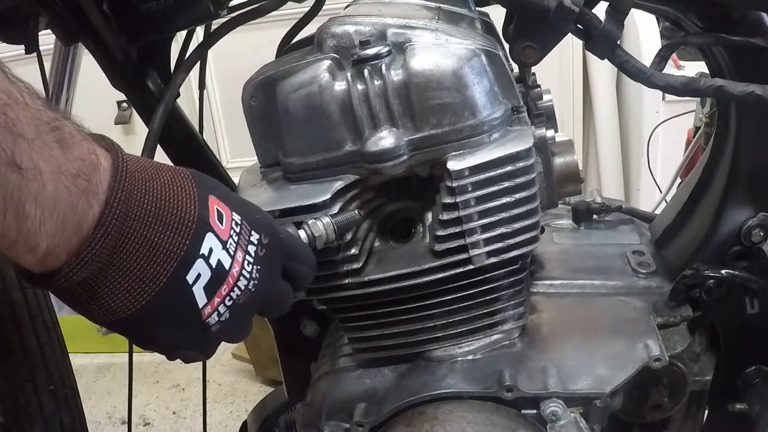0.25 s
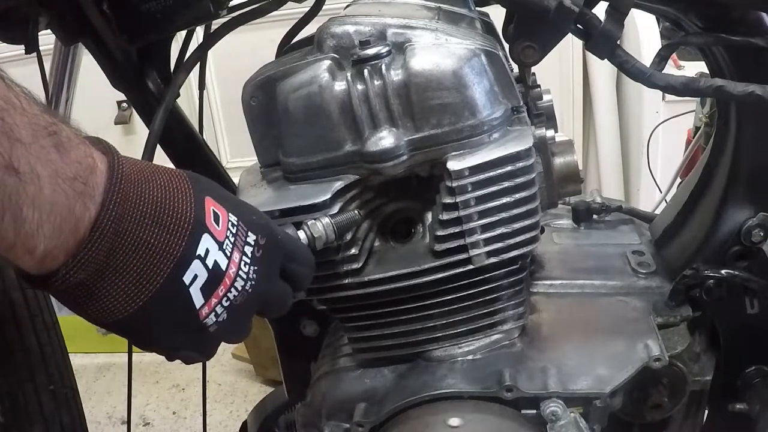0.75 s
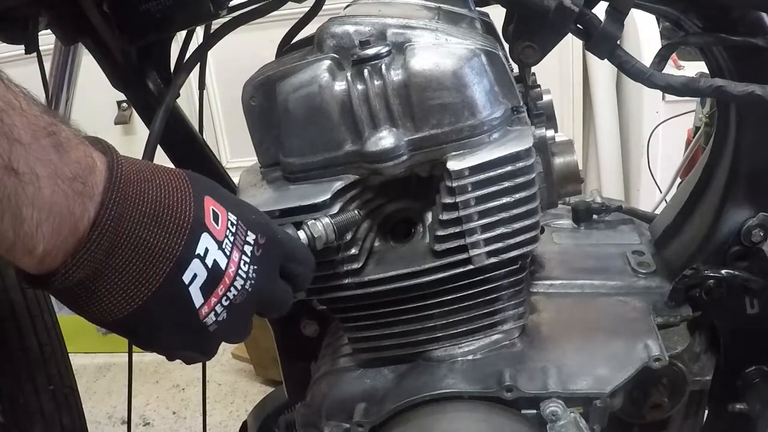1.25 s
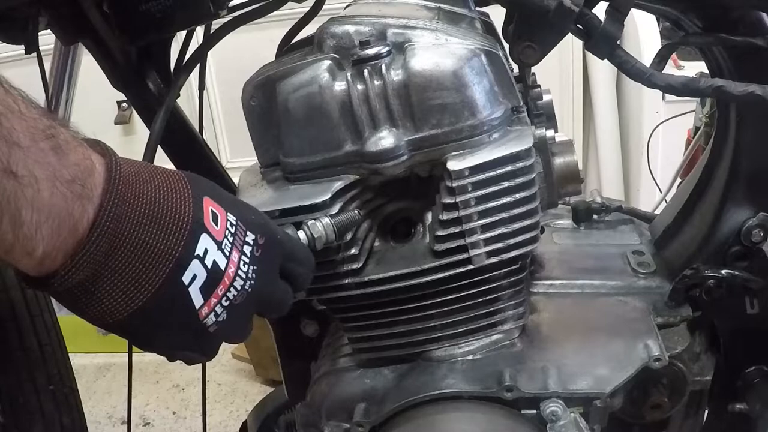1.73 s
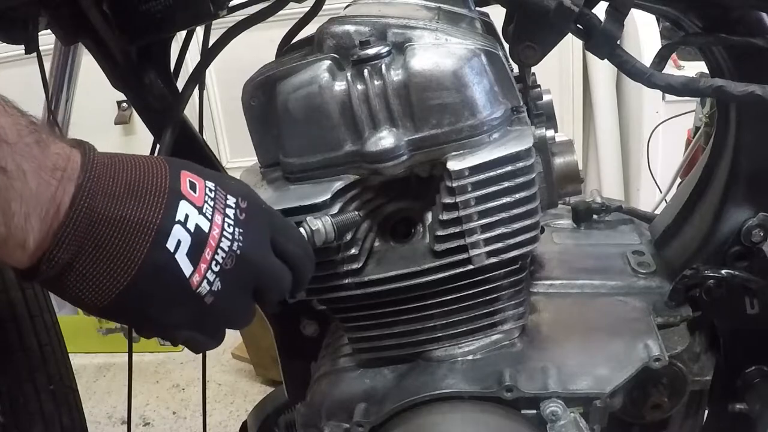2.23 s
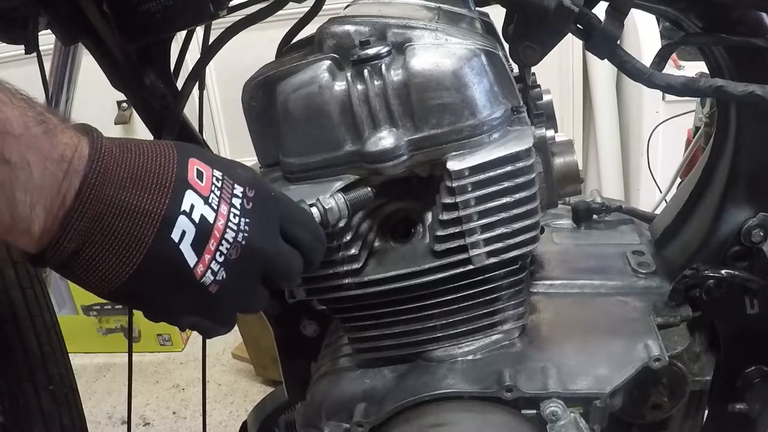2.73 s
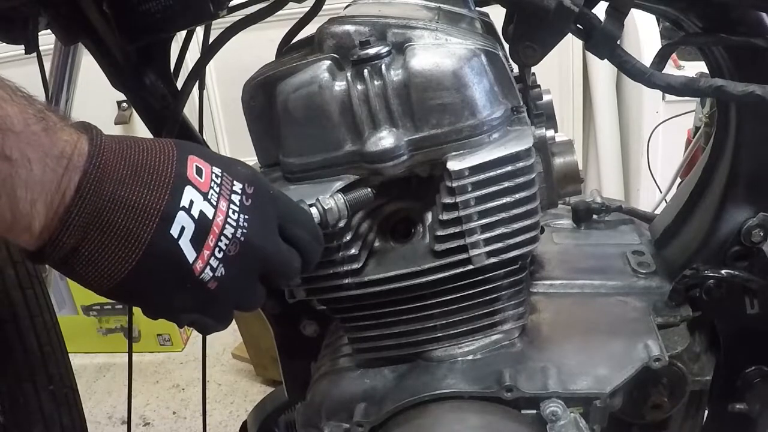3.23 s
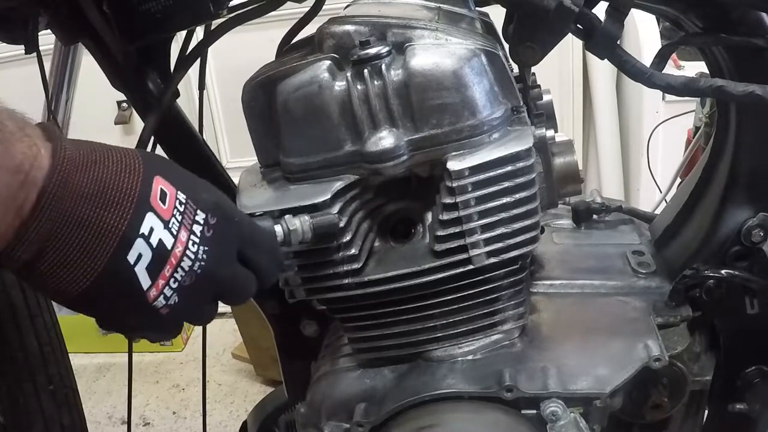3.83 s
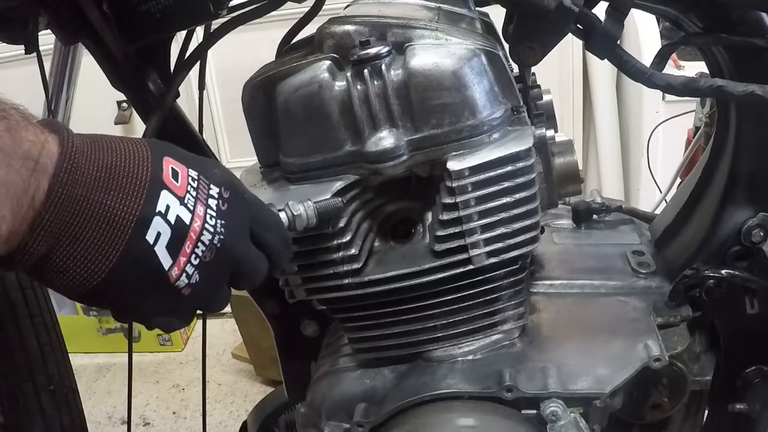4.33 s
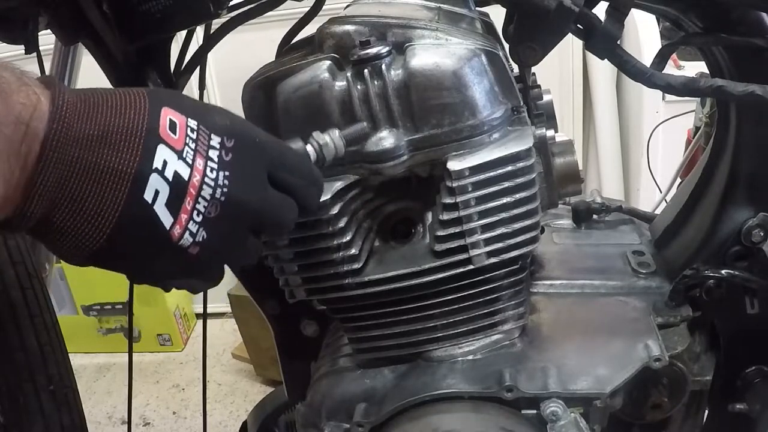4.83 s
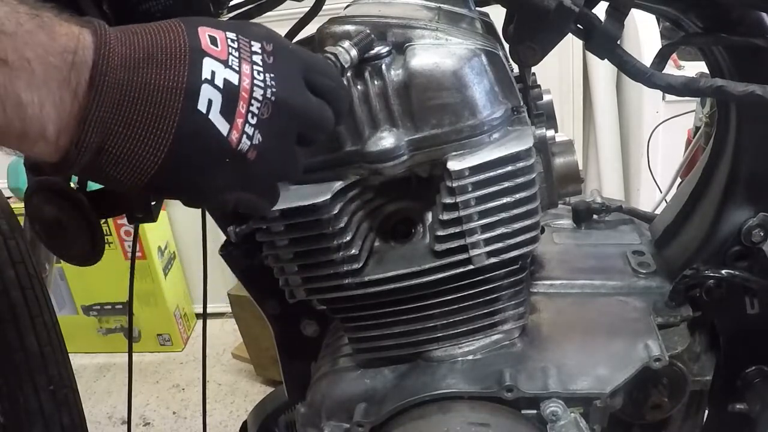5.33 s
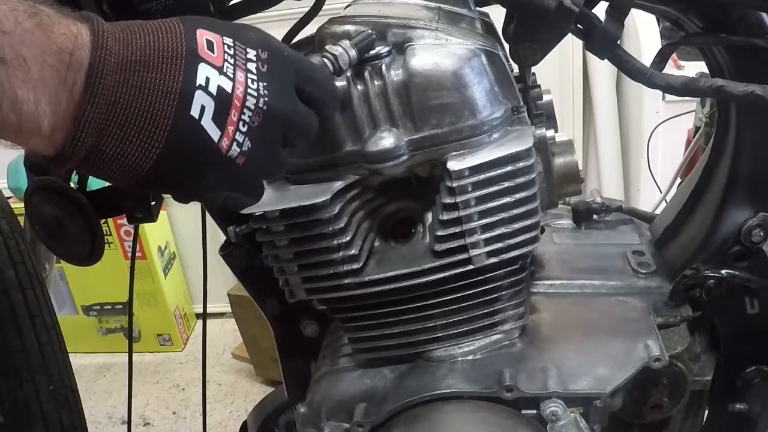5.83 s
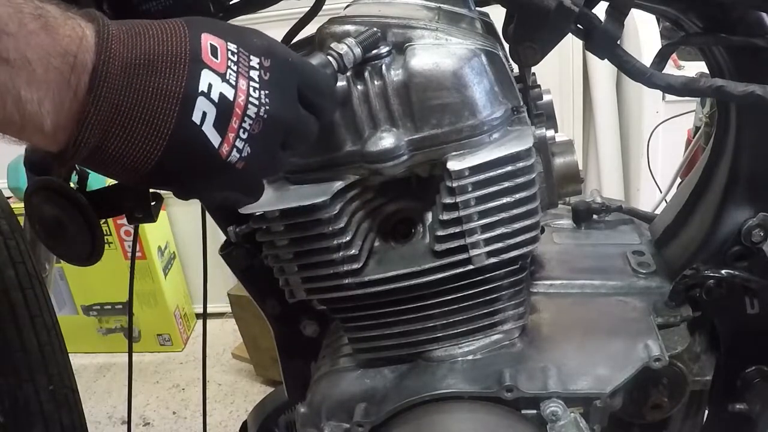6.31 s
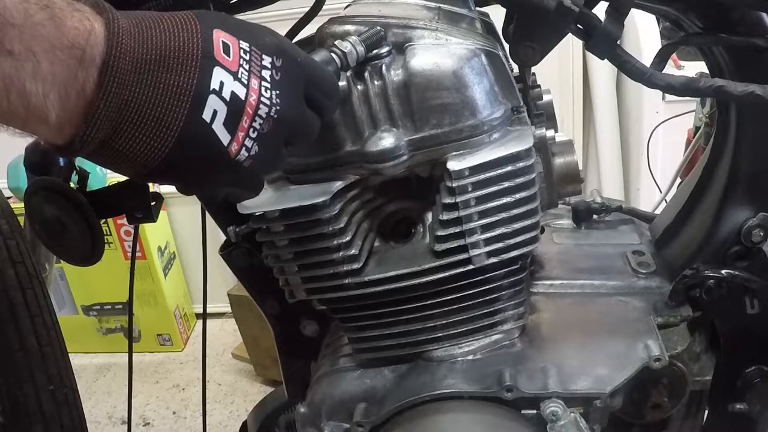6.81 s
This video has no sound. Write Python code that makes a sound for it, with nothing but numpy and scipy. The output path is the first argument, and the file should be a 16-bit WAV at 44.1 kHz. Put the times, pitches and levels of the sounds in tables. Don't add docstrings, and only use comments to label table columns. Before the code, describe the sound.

A motorcycle's electric starter clacks, whines up and grinds through rattling, pulsing cranks twice without the engine firing, in a humming garage.

```python
import sys
import numpy as np
from scipy import signal
from scipy.fft import rfft, irfft
from scipy.io import wavfile
from scipy.ndimage import uniform_filter1d, map_coordinates

SR = 44100
rng = np.random.default_rng(int(sys.argv[2]) if len(sys.argv) > 2 else 0)


def level_to_linear(level):
    exponent = np.asarray(level, float) / 20
    return 10 ** exponent


def materialize(psi):
    bounded = np.clip(np.atleast_2d(psi).T, -1, 1)
    quanta = np.round(bounded * 32767).astype(np.int16)
    wavfile.write(sys.argv[1], SR, quanta)


N = 311669

# (frequency [Hz], density [dB per Hz])
HUM_COLOUR = [(59, -18), (100, -15), (166, -3), (205, -6), (247, -8.5), (369, -16), (466, -15),
              (496, -17.5), (858, -23), (1870, -30.5), (3450, -41.5), (4730, -29), (7210, -43), (9890, -37),
              (15400, -70)]
RUMBLE_COLOUR = [(8.8, -33), (15, 3), (39, 0.5), (83, -3.5), (130, -8.5), (170, -30), (290, -120)]
MIC_HISS_COLOUR = [(10000, -30), (11000, -8), (12500, 0), (14000, -6), (15400, -10)]
# (time [s], level [dB])
RUMBLE_LEVEL = [(0.0, -38), (1.2, -44), (2.5, -40), (4.7, -39.5), (5.4, -42.5), (5.95, -46), (7.07, -59)]

# (frequency [Hz], density [dB per Hz])
RELAY_COLOUR = [(3800, -23), (4700, -8), (5300, -9), (6100, -4), (6900, -16)]
COIL_COLOUR = [(4800, -40), (5450, -12), (5700, 0), (6000, -8), (6700, -40)]
SWITCH_COLOUR = [(410, -35), (700, -6), (1760, -8), (3180, -7), (4440, -1), (5810, -9), (6860, -28),
                 (8210, -24), (15000, -37)]
TICK_COLOUR = [(1060, -40), (1800, -8), (2600, 1.5), (3900, -7.5), (4500, 3.5), (6220, -3), (8140, -7.5),
               (8820, -6.5), (10800, -20), (12200, -13), (15400, -19)]
# (time [s], level [dB], t60 [s])
RELAY_RINGS = [
    (.611, -34, 0.24),
    (5.624, -36, 0.27),
    (5.699, -43, 0.08),
]
# (time [s], level [dB], t60 [s])
COIL_RINGS = [
    (.6005, -41, .06),
    (5.608, -44, .09),
    (5.636, -42, 0.11),
]
# (time [s], level [dB], t60 [s])
SWITCH_TICKS = [
    (5.1793, -31, 0.067),
    (5.2435, -35, 0.06),
]
# (time [s], bright level [dB], case level [dB], t60 [s])
CLACKS = [
    (.6102, -33, -41, 0.11),
    (.6135, -51, -52, 0.04),
    (.6215, -50, -22, 0.034),
    (5.623, -30, -42, 0.032),
    (5.632, -38, -27.5, 0.091),
    (5.647, -51, -54, .06),
    (5.66, -53, -44, 0.046),
    (5.699, -38, -50, 0.037),
]

# (frequency [Hz], density [dB per Hz])
FRAME_COLOUR = [(110, -22), (160, 1), (260, 0), (400, -5.5), (520, -14)]
LOW_CASE_COLOUR = [(210, -51.5), (350, -17.5), (608, -6.5), (755, -4), (828, -9), (923, 0.5), (1200, -5),
                   (1560, -28), (2640, -120)]
CASE_COLOUR = [(650, -33.5), (1100, -9.5), (1230, -2.5), (1320, -1.5), (1520, 1), (1640, -6), (1990, -14),
               (2480, -12.5), (2870, -19), (3400, -21), (4420, -56), (7480, -120)]
BRIGHT_COLOUR = [(2000, -36), (3400, -11.5), (3780, -5), (3940, -2), (4710, 2.5), (5460, 0), (6700, -8),
                 (8710, -32), (14700, -120)]
EDGE_COLOUR = [(3940, -30), (6700, -5.5), (7100, -3), (8770, -2), (11000, -24.5), (14300, -48),
               (22000, -120)]
TOP_COLOUR = [(6180, -40), (10500, -19.5), (11100, -30), (11600, -16), (12400, -10), (15500, -21.5)]
# (frequency [Hz], width [Hz], peak over colour [dB])
CASE_MODES = [(503.3, 22, 7.5), (608, 7.7, 10), (750, 4.9, 8), (1060, 58, 3.5), (1350, 12.4, 8),
              (1485, 15.4, 9.5), (1576, 19, 8.5), (1655, 26, 6), (1837, 29, 8), (1975, 26, 9),
              (2152, 36, 7.5), (2383, 14, 7), (2555, 38, 4.5), (3023, 40, 6)]
FIN_MODES = [(4000, 40, 6), (4300, 35, 4.5), (4555, 30, 5.5), (4847, 35, 5.5), (5080, 30, 4), (5285, 32, 7),
             (5575, 45, 7), (6125, 50, 6), (6236, 28, 8), (6429, 24, 7), (6600, 45, 6), (7428, 34, 6.5),
             (7865, 70, 6), (8437, 40, 6)]
STEEL_MODES = [(7105, 50, 6), (7200, 30, 4), (7683, 40, 9), (8100, 22, 8), (8560, 80, 4), (8846, 60, 6),
               (9250, 40, 5), (9422, 40, 5), (11900, 50, 7), (12300, 50, 7), (12650, 50, 7), (13100, 55, 6),
               (13600, 55, 6), (14200, 60, 6)]

# (time [s], half length [s], level [dB])
COVER_SONGS = [(.646, 0.022, -34.5), (.79, .05, -41), (.89, 0.046, -32.5), (.955, 0.045, -27),
               (1.42, .08, -24), (1.56, 0.075, -18.5), (1.74, 0.067, -21), (1.975, 0.058, -19.5),
               (2.21, 0.06, -30), (2.55, .1, -37), (2.96, 0.042, -22.5), (3.18, .06, -28),
               (3.36, 0.046, -22), (3.78, 0.044, -26.5), (4.41, 0.057, -17.5), (4.505, 0.051, -20.5),
               (4.57, 0.032, -22), (4.66, .04, -38), (4.78, 0.082, -31.5), (4.88, 0.052, -41),
               (5.66, 0.036, -42), (5.735, .035, -30), (5.82, 0.055, -31), (5.96, .05, -35),
               (6.128, 0.043, -29), (6.42, 0.11, -28)]
PANEL_SONGS = [
    (.99, .04, -38),
    (5.765, .035, -32),
    (6.33, 0.054, -24.5),
    (6.58, 0.044, -26),
    (6.85, .05, -30.5),
]

# (frequency [Hz], density [dB per Hz])
PUFF_COLOUR = [(7500, -30), (8600, -6), (9400, -4), (10500, -6), (11800, -9), (13000, -30)]
VALVE_COLOUR = [(5000, -25), (7500, -2), (9500, -6), (11000, -11), (12300, 0), (15200, -3), (16000, -30)]
# (time [s], bright level [dB], case level [dB], t60 [s])
KNOCKS = [(.7226, -48, -46, .06), (1.1247, -29, -34, .08), (4.533, -31, -32, .07), (4.57, -38, -32, .05),
          (4.617, -35, -32, .06), (5.788, -40, -36, .05), (5.9372, -38, -29, 0.066),
          (.877, -43, -38, 0.087), (.9076, -40, -34, .08), (.965, -38, -18, 0.074), (1.102, -27, -40, .08),
          (4.6336, -42, -14, 0.032), (4.688, -38.5, -23, 0.13), (4.7224, -38, -21, .07),
          (4.736, -45, -28, .05), (4.7618, -44, -28, .06), (4.782, -53, -32, 0.092),
          (5.7395, -42, -43, .06), (5.7999, -35, -30, .1), (5.9596, -37, -24, 0.11), (6.135, -34, -42, .15),
          (6.1792, -30, -28, .1)]

# (current on [s], chain pulls tight [s], clutch takes up [s], current off [s], gears at rest [s])
RUNS = [
    (0.614, .91, 1.12, 4.53, 4.96),
    (5.64, 5.752, 6.16, 7.5, 7.9),
]
# (time [s], mean tooth rate [Hz])
TOOTH_RATE = [(.75, 380), (.96, 492), (1.01, 543), (1.06, 568), (1.13, 628), (1.22, 662), (1.45, 744),
              (1.85, 802), (2.4, 828), (4.2, 838), (4.553, 778), (4.635, 515), (4.9, 147), (5.72, 350),
              (5.82, 458), (5.855, 447), (5.915, 400), (5.97, 485), (6.01, 506), (6.045, 549), (6.12, 560),
              (6.19, 612), (6.3, 645), (7.07, 694)]
# (time [s], level [dB])
SHAKING = [(.63, -47), (.70, -34), (.95, -27.5), (1.08, -26), (1.17, -21.5), (1.9, -22), (4.5, -21),
           (4.66, -30), (4.82, -32.5), (4.95, -64), (5.65, -67), (5.74, -35), (5.85, -24), (5.94, -25.5),
           (6.1, -24), (6.2, -23), (6.7, -21.5), (7.07, -24)]
# (time [s], half length [s], share of slack [0..1])
SLACK_MOMENTS = [
    (4.666, .022, 0.36),
    (5.925, 0.04, 0.57),
    (6.118, .018, 0.25),
]
# (time [s], first stroke [dB], second stroke [dB])
TURNS = [(.36, -17, -11), (.78, -7.5, 5), (1.131, 0.5, -1), (1.397, 2, 0), (1.647, 2, 0), (1.88, 1.5, -0.5),
         (2.107, 2, 0.5), (2.335, 2, 0.5), (2.561, 1.5, -1), (2.779, 2, -0.5), (3.001, 1, 0),
         (3.221, 1.5, -1), (3.435, 1.5, -0.5), (3.66, 1, -0.5), (3.88, 1.5, -0.5), (4.092, 0.5, -1.5),
         (4.312, 0.5, -2), (4.54, 4, -6), (4.821, -20, -2), (5.4, -25, 18), (5.81, -4, 0),
         (6.189, -0.5, -0.5), (6.484, 0.5, -2), (6.763, 1, -1), (7.036, 3.5, -4), (7.31, 0, 0)]
TURN_SPEED = [(0.0, 1.065), (.08, 1.05), (.3, .95), (.4, .93), (.5, .97), (.6, 1.02), (.72, 1.0),
              (.84, .95), (.93, 1.01)]
# (share of turn [0..1], whine [dB], overtone [dB], case rattle [dB], bright rattle [dB])
STROKES = [(0.0, 2.5, 2.5, 0, 3), (.12, 0.5, 12.5, 2.5, -3), (.27, -3.5, 10.5, -1, -2.5),
           (0.366, -5, -10, -2, -2.5), (.5, -2.5, -47, -1, 2), (.6, 2.5, 12, 1.5, 1), (.72, 1, 3, 3, 0.5),
           (.87, -5.5, -9, -5, -2), (.95, -5.5, 4, -1.5, 0.5)]
# (share of turn [0..1], top rattle [dB], puff from plug hole [dB], cover [dB])
BREATHS = [(0.0, 0.5, -12, -11), (.08, 0, -1, -6), (.14, -2.5, 4, -8), (.27, -3, 0, -8), (.36, -3, -12, -3),
           (.48, -1.5, -20, 6), (.62, 2, -12, 3.5), (.78, 2.5, -14, 0), (.87, -7, -25, 8.5),
           (.94, 1, -20, -3)]

# (multiple of tooth rate, level [dB], group [0 whine, 1 overtone, 2 third and fourth])
GEAR_LINES = [(1.0, 0.5, 0), (1.111, -4, 0), (1.778, -12.5, 1), (1.889, -12, 1), (2.0, -3.5, 1),
              (2.111, -17.5, 1), (2.222, -13, 1), (3.0, 2, 2), (4.0, 3, 2)]
# (frequency [Hz], gain [dB])
WHINE_PATH = [(300, -17), (500, -5), (860, 1), (1050, -4), (1300, 1.5), (1690, 0.5), (1870, 0),
              (1990, -15.5), (3500, -42.5)]
# (free running [dB], under load [dB], rise under load [dB per 100 Hz of tooth rate])
TONES = [
    (-20, -7.5, 3.5),
    (-32, -10.5, -0.2),
    (-17, -28, -7),
]
# (time [s], half length [s], level [dB], group [0..2])
FLARES = [(1.008, 0.057, -23.5, 2), (1.06, .05, -27, 1), (1.071, 0.097, -35.5, 0), (1.175, 0.047, -29.5, 1),
          (1.45, .1, -36, 2), (1.95, 1, -30.5, 1), (4.572, 0.048, -20, 1), (4.623, 0.054, -23, 1),
          (4.46, 0.019, -23, 1), (1.428, 0.067, -26.5, 1), (6.382, .03, -30, 1), (5.866, 0.069, -29, 2),
          (5.874, .06, -36, 0), (6, 0.033, -27.5, 2), (6.064, 0.05, -32.5, 0), (6.082, 0.044, -26.5, 2),
          (6.114, 0.085, -29, 1), (6.202, 0.03, -26.5, 1), (6.325, .05, -31, 0), (.76, 0.057, -44.5, 2),
          (.83, 0.034, -40, 2), (1.198, 0.19, -31.5, 0), (1.325, .1, -31.5, 0), (1.69, 0.063, -27, 1),
          (1.923, .04, -27, 1), (2.16, .035, -25.5, 1), (6.53, .055, -28.5, 1), (6.666, 0.033, -23, 1),
          (6.801, 0.044, -27.5, 1), (6.952, .03, -28, 1), (7.045, .03, -24.5, 1)]

FULL_HZ = 830


def rms_one(x):
    return x / np.sqrt(np.mean(x ** 2) + 1e-20)


def in_time(rows):
    s, *columns = np.transpose(rows)
    return np.array([np.interp(np.arange(N) / SR, s, column) for column in columns])


def drift(rate_hz):
    knots = rng.standard_normal(4000)
    return map_coordinates(knots, [np.arange(N) / SR * rate_hz], order=3)


def coloured(x, spectrum, modes=()):
    size = 16384
    hz = np.maximum(np.fft.rfftfreq(size, 1 / SR), 1)
    at_hz, db = np.transpose(spectrum)
    gain = level_to_linear(np.interp(np.log(hz), np.log(at_hz), db, db[0] - 38.5, db[-1] - 41.5))
    for mode_hz, width_hz, mode_db in modes:
        gain = gain * (1 + (level_to_linear(mode_db) - 1) / (1 + (2 * (hz - mode_hz) / width_hz) ** 2))
    cepstrum = irfft(np.log(gain))
    cepstrum[1:size // 2] *= 2
    cepstrum[size // 2 + 1:] = 0
    response = irfft(np.exp(rfft(cepstrum)))
    return signal.fftconvolve(x, response / np.sqrt(np.sum(response ** 2)))[:N]


def grains(per_s, spread_db, hiss):
    sizes = level_to_linear(spread_db * np.minimum(rng.exponential(1, N), 4)) * rng.choice([-1, 1], N)
    contacts = rms_one(sizes * (rng.random(N) < per_s / SR))
    return rms_one(contacts + hiss * rng.standard_normal(N))


def bursts(rows, column, rise_s):
    envelope = np.zeros(N + SR)
    chatter = grains(6000, spread_db=1.5, hiss=1.5)
    age = np.arange(SR // 2) / SR
    for row in rows:
        at = int(row[0] * SR)
        decay = level_to_linear(row[column] - 60 * age / row[-1])
        envelope[at:at + len(age)] += np.minimum(age / rise_s, 1) * decay
    return envelope[:N] * chatter


def flares(rows):
    fall_db = 17
    t = np.arange(0, N, 32) / SR
    top_db = np.max([row[2] - fall_db * ((t - row[0]) / row[1]) ** 2 for row in rows], axis=0)
    return np.interp(np.arange(N) / SR, t, top_db)


def garage():
    hum = level_to_linear(-43.5 + 0.26 * drift(2.37)) * coloured(rng.standard_normal(N), HUM_COLOUR)
    rumble_gain = level_to_linear(in_time(RUMBLE_LEVEL)[0] + 0.89 * drift(4.0))
    rumble = rumble_gain * coloured(rng.standard_normal(N), RUMBLE_COLOUR)
    hiss = level_to_linear(-76) * coloured(rng.standard_normal(N), MIC_HISS_COLOUR)
    return hum + rumble + hiss


def clacks():
    thud_colour = [(400, -12), (800, 5), (1150, 12.5), (1600, 4), (2200, 0), (3000, -10)]   # (Hz, dB per Hz)
    switch = level_to_linear(-6.5) * coloured(bursts(SWITCH_TICKS, column=1, rise_s=0.00064), SWITCH_COLOUR)
    can = coloured(bursts(RELAY_RINGS, column=1, rise_s=.0015), RELAY_COLOUR, FIN_MODES)
    coil = coloured(bursts(COIL_RINGS, column=1, rise_s=.004), COIL_COLOUR)
    snap = coloured(bursts(CLACKS, column=1, rise_s=0.00062), TICK_COLOUR, FIN_MODES)
    thud = coloured(bursts(CLACKS, column=2, rise_s=0.0036), thud_colour, CASE_MODES)
    return snap + thud + can + coil + switch


def singing_panel(songs, hz, width_hz, hum_db):
    r = np.exp(-np.pi * width_hz / SR)
    w = 2 * np.pi * hz / SR
    ring = rng.standard_normal(N)
    for _ in range(2):
        ring = signal.lfilter([1, 0, -1], [1, -2 * r * np.cos(w), r * r], ring)
    steady = ring / np.sqrt(uniform_filter1d(ring ** 2, size=1200))
    return steady * level_to_linear(np.maximum(flares(songs), hum_db) - 4.5)


def valves(load):
    s = np.transpose(TURNS)[0]
    seats = (s[:-1, None] + np.diff(s)[:, None] * (.48, .93)).ravel()
    strengths_db = -55 + 4 * rng.standard_normal(len(seats))
    t60_s = .05
    rows = [(at, db, t60_s) for at, db in zip(seats, strengths_db) if at < N / SR]
    return load * coloured(bursts(rows, column=1, rise_s=.001), VALVE_COLOUR, STEEL_MODES)


def puff(level_db):
    whistle = [(9350, 200, 8)]   # (Hz, width Hz, dB)
    return coloured(rng.standard_normal(N) * level_to_linear(level_db - 35.5), PUFF_COLOUR, whistle)


def knocks():
    sharp = bursts(KNOCKS, column=1, rise_s=0.0026)
    fins = coloured(sharp, BRIGHT_COLOUR, FIN_MODES)
    steel = level_to_linear(-11) * coloured(sharp, EDGE_COLOUR, FIN_MODES + STEEL_MODES)
    top = level_to_linear(-21) * coloured(sharp, TOP_COLOUR, STEEL_MODES)
    cases = coloured(bursts(KNOCKS, column=2, rise_s=0.0039), CASE_COLOUR, CASE_MODES)
    return fins + steel + top + cases


def starter():
    take_up_s, tighten_s = 0.062, 0.065
    coast_lag_s = 0.1
    (tooth_hz,), (shake_db,) = in_time(TOOTH_RATE), in_time(SHAKING)
    t = np.arange(N) / SR

    def ramp(s, span=take_up_s):
        return np.clip((t - s) / span + .5, 0, 1)

    turning = sum((t > on) & (t < rest) for on, *_, rest in RUNS)
    slack = sum((t > on) - ramp(tight, tighten_s) for on, tight, *_ in RUNS)
    slack = slack + sum(share * np.exp(-((t - s) / half) ** 2) for s, half, share in SLACK_MOMENTS)
    load = sum(ramp(clutch) - ramp(off) for *_, clutch, off, _ in RUNS)
    coast = sum(ramp(off + coast_lag_s) - ramp(rest) for *_, off, rest in RUNS)
    return tooth_hz, np.where(turning, shake_db, -120), load, np.clip(slack, 0, 1), coast


def crank():
    s, first_db, second_db = np.transpose(TURNS)
    angle = np.interp(np.arange(N) / SR, s, np.arange(len(s)))
    loads = []
    for table in (STROKES, BREATHS):
        share, *columns = np.transpose(table)
        loads += [np.interp(angle % 1, share, column, period=1) for column in columns]
    centres = (np.arange(len(s))[:, None] + [.17, .67]).ravel()
    effort_db = np.interp(angle, centres, np.stack([first_db, second_db], axis=1).ravel())
    speed = np.interp(angle % 1, *np.transpose(TURN_SPEED), period=1)
    return speed, np.array(loads) + effort_db


def rattle(teeth, tooth_hz, shake_db, slack, coast, low_load_db, case_load_db, bright_load_db, top_load_db):
    low_db = shake_db - 9 + 10 * coast
    bright_db = shake_db - 10.5 - 5 * slack - 4 * coast
    top_db = shake_db - 28 - 22 * slack - 5 * coast + .026 * (tooth_hz - FULL_HZ)
    edge_db = 0.54 * bright_db + 0.43 * top_db - 6

    pinion_teeth = 9
    pinion = 2 * np.pi * teeth / pinion_teeth
    throb_db = 0.5 * np.sin(pinion) + 0.24 * np.sin(2 * pinion + 1) + 0.42 * drift(30)
    shared = grains(5000, spread_db=1.5, hiss=1.59) * level_to_linear(throb_db)
    chain = grains(8000, spread_db=3.5, hiss=2.8) * level_to_linear(throb_db)
    finer = rms_one(0.64 * shared + chain)

    bright_level = bright_db + bright_load_db + 0.77 * drift(35)
    edge_level = edge_db + 0.7 * bright_load_db + .3 * top_load_db + 0.72 * drift(30)
    top_level = top_db + top_load_db + 1.2 * drift(30) + 1.2 * drift(60)
    low = coloured(shared * level_to_linear(low_db + low_load_db), LOW_CASE_COLOUR, CASE_MODES)
    case = coloured(shared * level_to_linear(shake_db + case_load_db), CASE_COLOUR, CASE_MODES)
    bright = coloured(finer * level_to_linear(bright_level), BRIGHT_COLOUR, FIN_MODES)
    edge = coloured(finer * level_to_linear(edge_level), EDGE_COLOUR, FIN_MODES + STEEL_MODES)
    top = coloured(finer * level_to_linear(top_level), TOP_COLOUR, STEEL_MODES)
    frame = coloured(rng.standard_normal(N) * level_to_linear(.5 * shake_db - 37.0), FRAME_COLOUR)
    return frame + low + case + bright + edge + top


def tones(tooth_hz, shake_db, load):
    levels_db = []
    for group, (free_db, load_db, rise_db) in enumerate(TONES):
        loaded_db = load_db + rise_db * (tooth_hz - FULL_HZ) / 100
        steady_db = shake_db + (1 - load) * free_db + load * loaded_db
        flare_db = flares([row for row in FLARES if row[3] == group])
        levels_db.append(np.maximum(steady_db, flare_db))
    return np.where(shake_db > -100, levels_db, -120)


def whine(teeth, groups_db):
    out = np.zeros(N)
    for multiple, db, group in GEAR_LINES:
        phase = 2 * np.pi * multiple * teeth + .3 * drift(40)
        out += level_to_linear(db + groups_db[group] + 1.6 * drift(26)) * np.sin(phase)
    out += level_to_linear(groups_db[0] - 4) * drift(200) * np.sin(2 * np.pi * 1.06 * teeth)
    out += level_to_linear(groups_db[1] - 13) * drift(300) * np.sin(2 * np.pi * 2.05 * teeth)
    soft_modes = [(hz, 2 * width_hz, .4 * db) for hz, width_hz, db in CASE_MODES]
    return level_to_linear(-11) * coloured(out, WHINE_PATH, soft_modes)


def scene():
    tooth_hz, shake_db, load, slack, coast = starter()
    whine_db, overtone_db, third_db = tones(tooth_hz, shake_db, load)
    swing = load * np.clip(1 - .006 * (tooth_hz - 795), 0, 1.4)
    speed, loads = crank()
    loads = loads * np.clip(load, .3, 1)
    whine_load, overtone_load, case_load, bright_load, top_load, puff_load, cover_load = loads
    teeth = np.cumsum(tooth_hz * (1 + swing * (speed - 1))) / SR

    gears = whine(teeth, [whine_db + whine_load, overtone_db + overtone_load, third_db])
    calm_db = -1.5 * np.clip((flares(FLARES) + 38.5) / 21.5, 0, 1)
    loose = rattle(teeth, tooth_hz, shake_db, slack, coast,
                   whine_load, case_load + calm_db, bright_load, top_load)
    air = puff(shake_db + puff_load - 40 * (1 - load))
    engine = gears + loose + air + knocks() + valves(load)

    cover_hum_db = shake_db - 15.5 + cover_load - 6 * slack
    cover = singing_panel(COVER_SONGS, 767.6, 13.8, cover_hum_db)
    panel = singing_panel(PANEL_SONGS, 609, 28, -120)
    return np.tile(engine + cover + panel + clacks() + garage(), (2, 1))


def top_cut(x):
    return signal.sosfilt(signal.butter(12, 15620, fs=SR, output="sos"), x)


def record(dry):
    wide_from_hz, cutoff_hz = 10900, 15270
    top_octave = signal.ellip(8, .5, 70, wide_from_hz, "high", fs=SR, output="sos")
    dry = .5 * np.tanh(dry / .5)
    high = signal.sosfiltfilt(top_octave, dry[0])
    unlinked = high * np.sign(drift(250))
    side = level_to_linear(-1.5) * signal.sosfilt(top_octave, unlinked) - .2 * high
    cut = signal.ellip(10, .5, 80, cutoff_hz, fs=SR, output="sos")
    mix = signal.sosfilt(cut, dry + side * [[1], [-1]])
    return top_cut(mix)


dry = scene()
out = record(dry)
materialize(out)
```